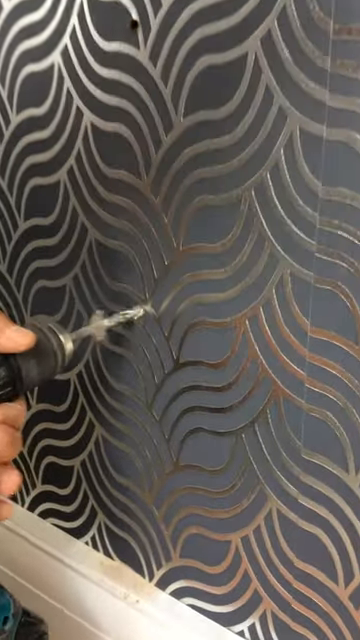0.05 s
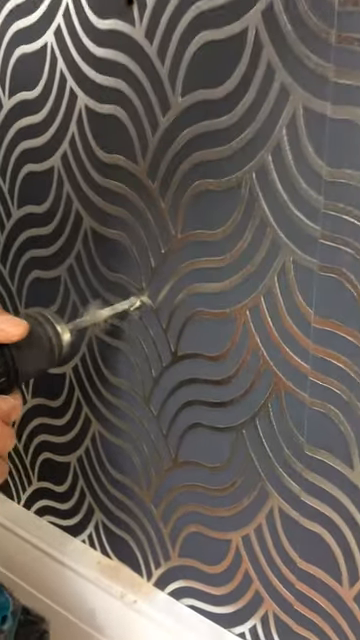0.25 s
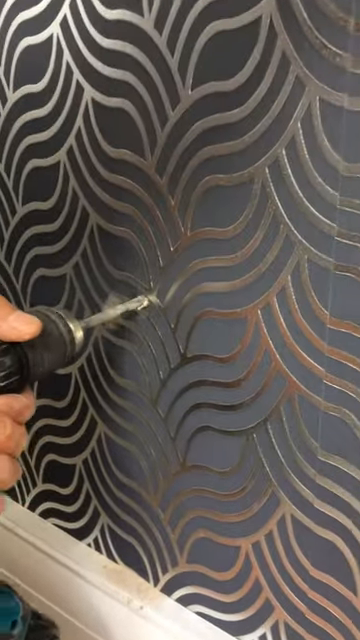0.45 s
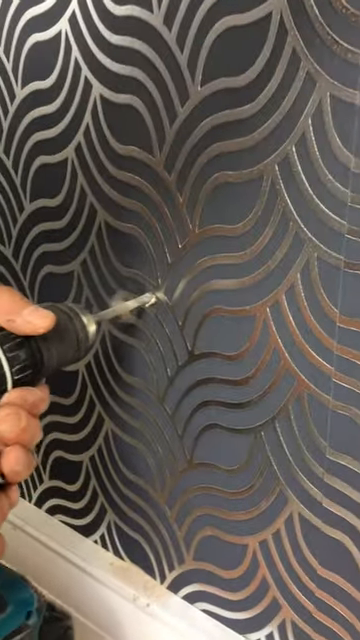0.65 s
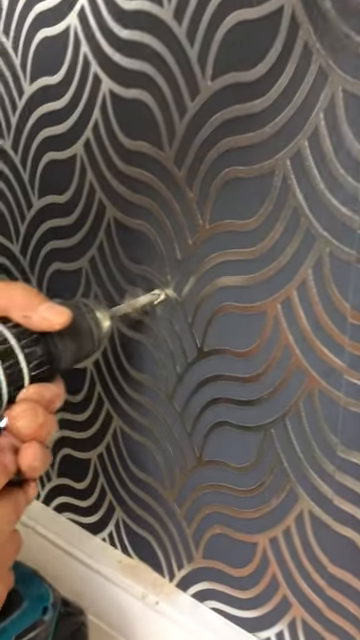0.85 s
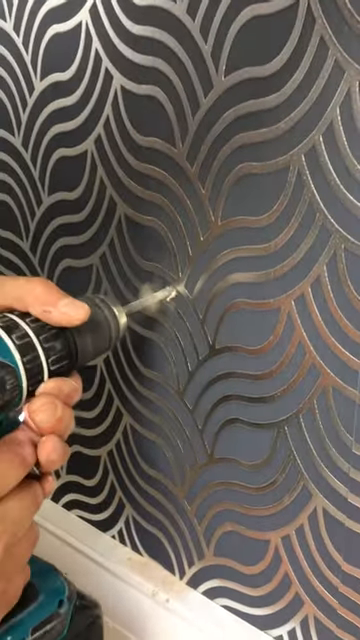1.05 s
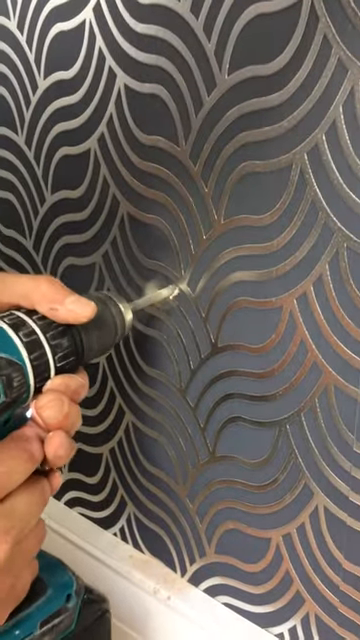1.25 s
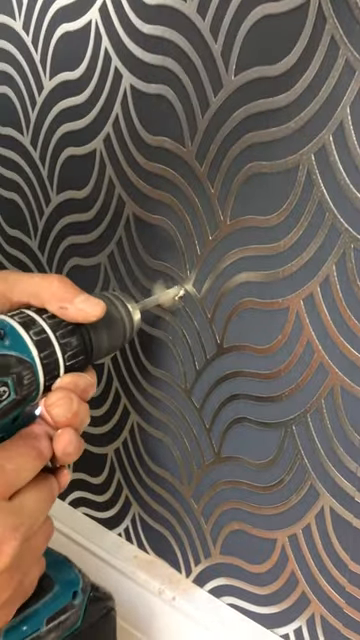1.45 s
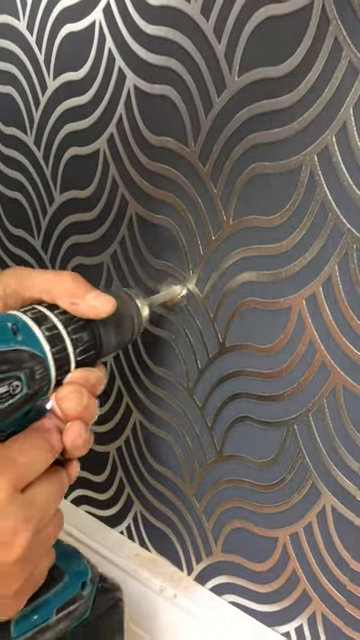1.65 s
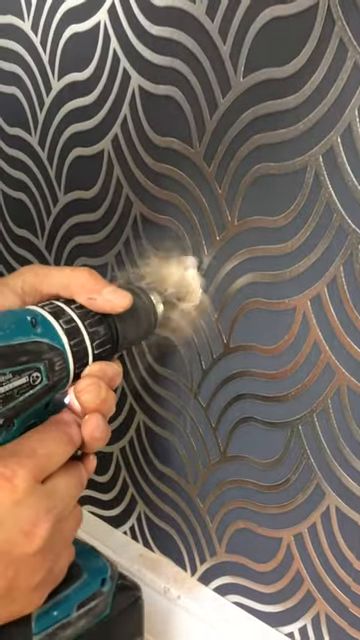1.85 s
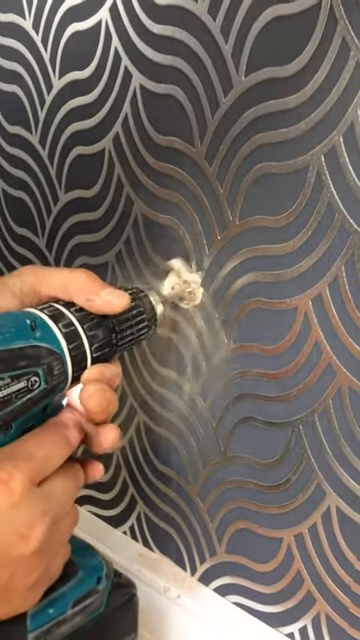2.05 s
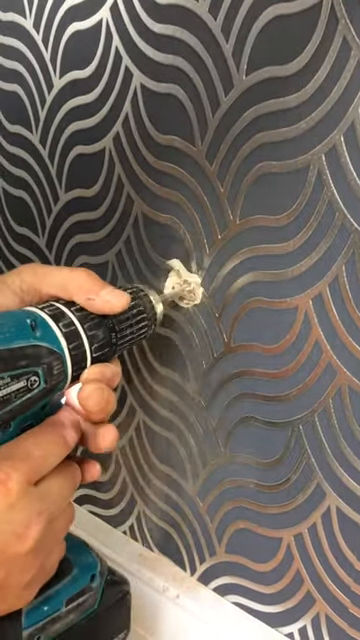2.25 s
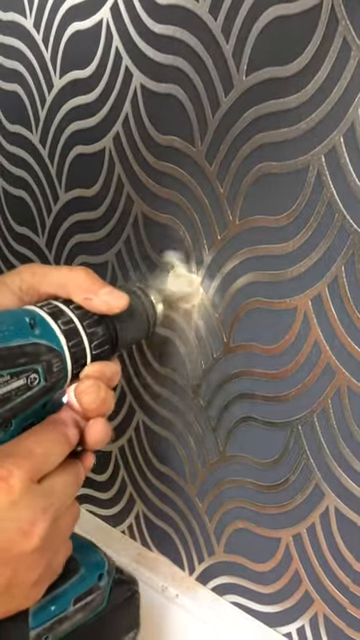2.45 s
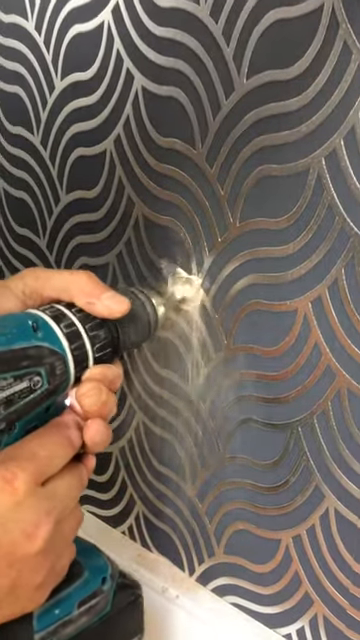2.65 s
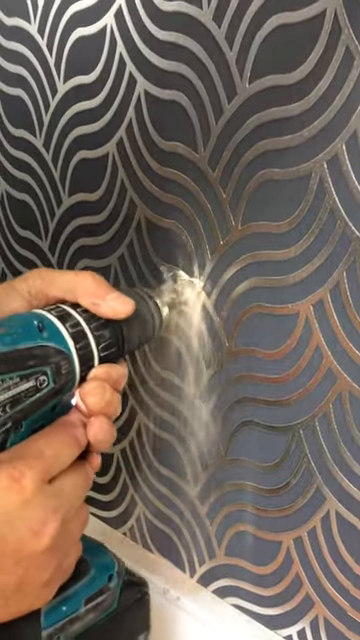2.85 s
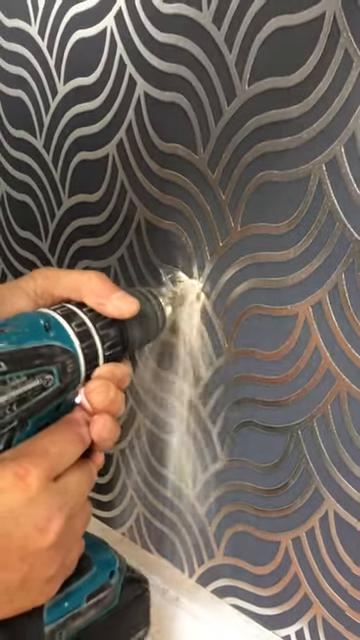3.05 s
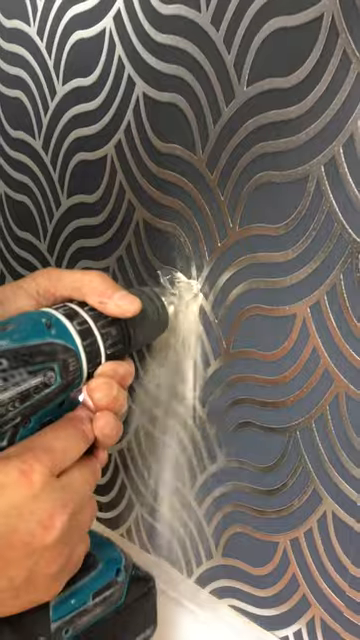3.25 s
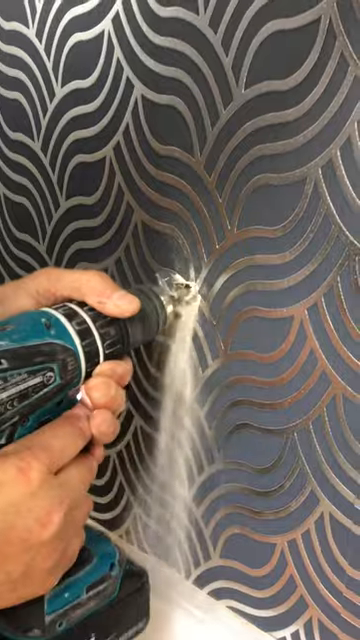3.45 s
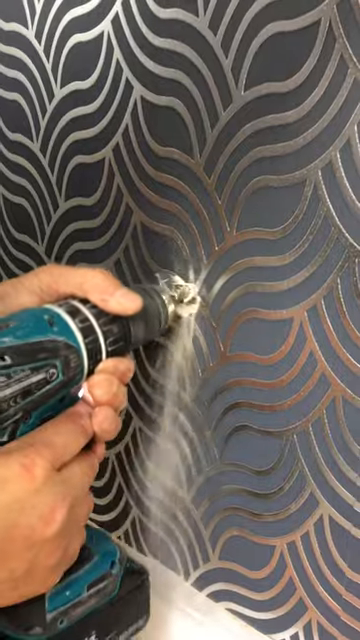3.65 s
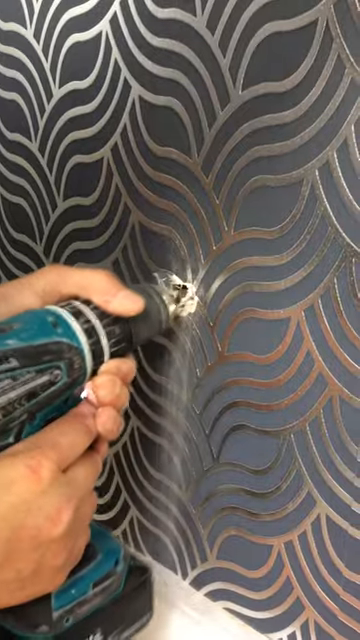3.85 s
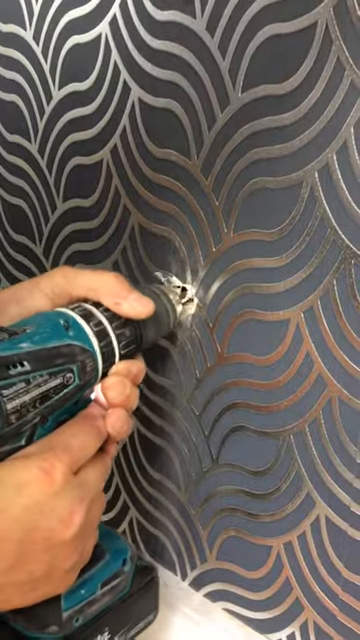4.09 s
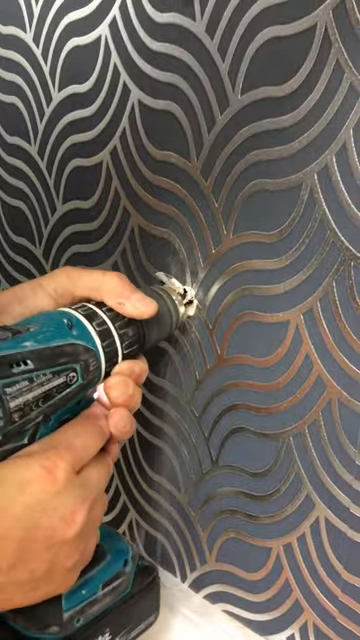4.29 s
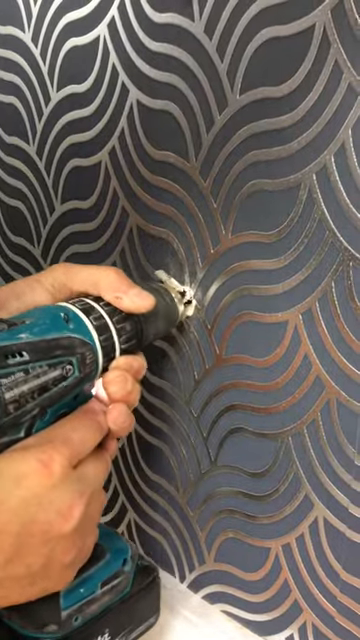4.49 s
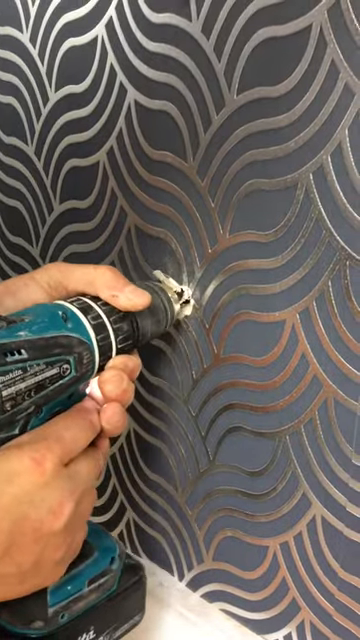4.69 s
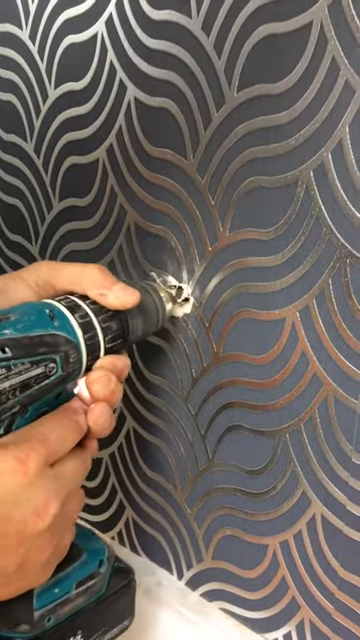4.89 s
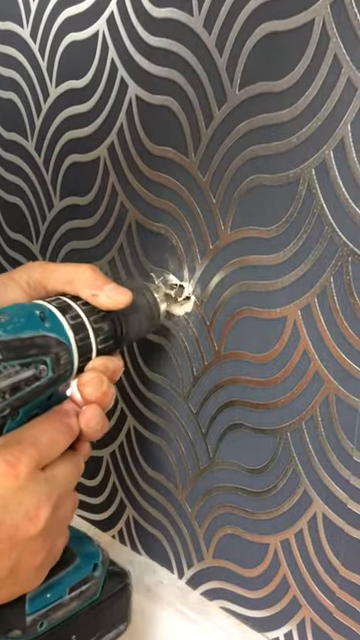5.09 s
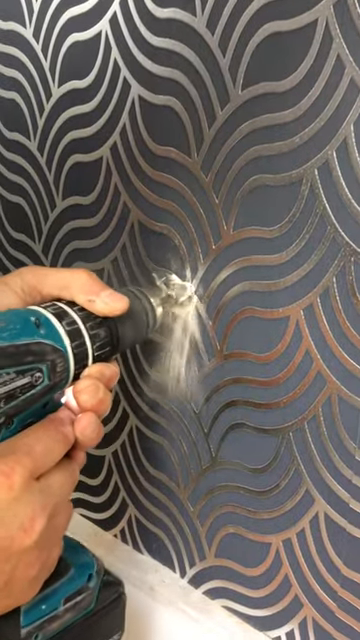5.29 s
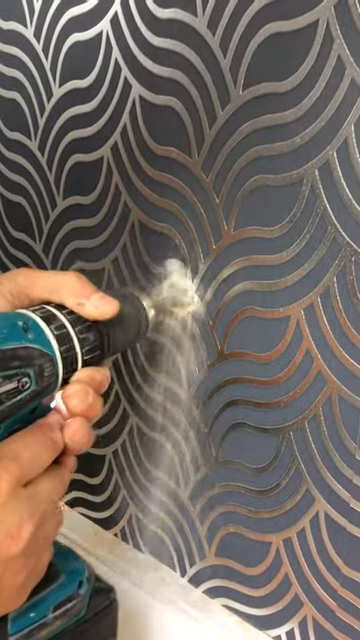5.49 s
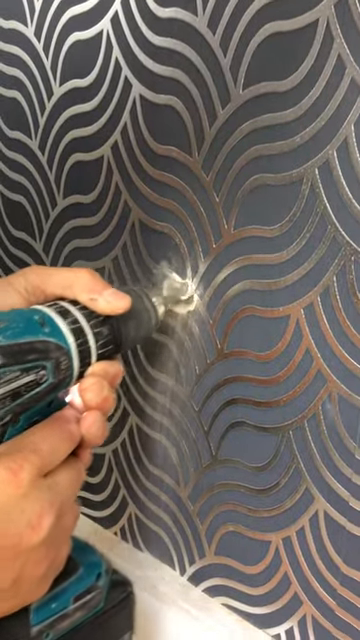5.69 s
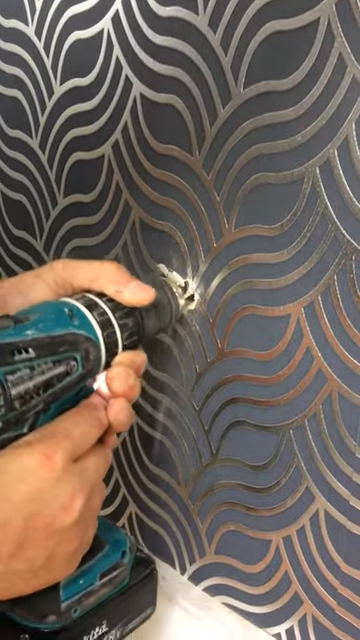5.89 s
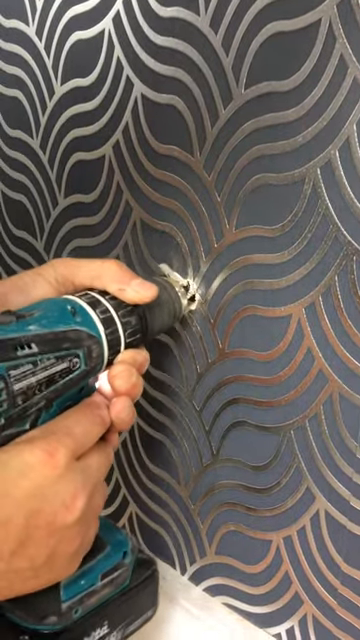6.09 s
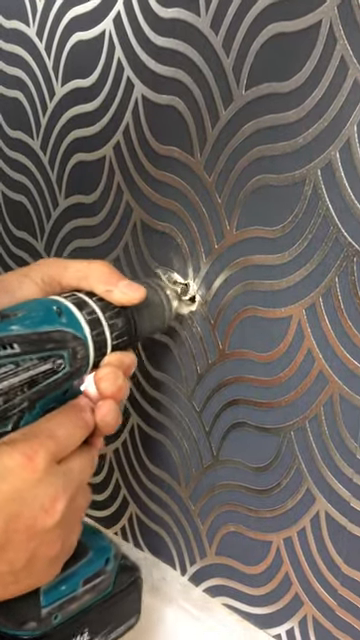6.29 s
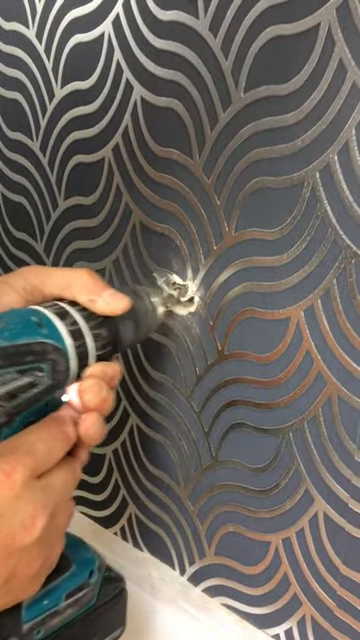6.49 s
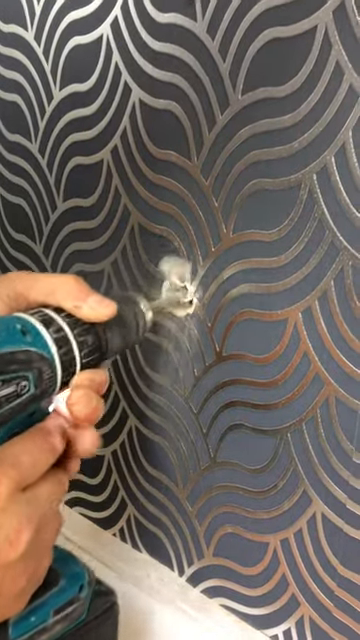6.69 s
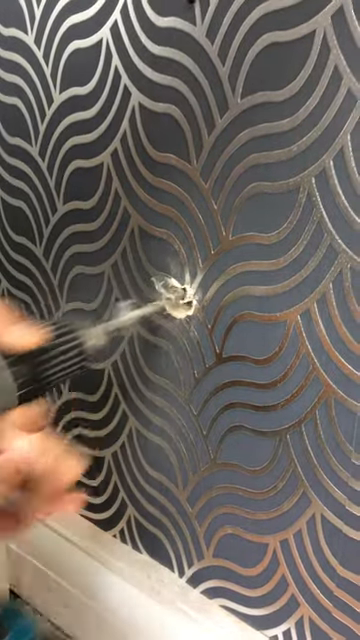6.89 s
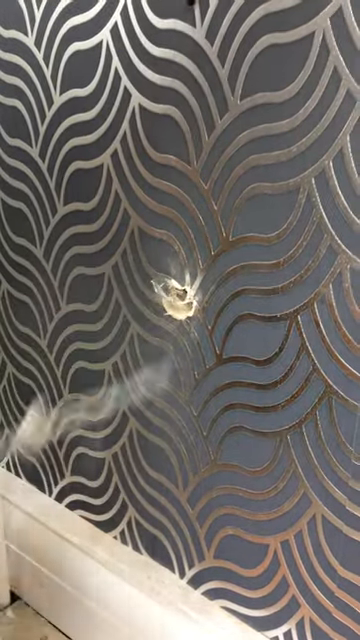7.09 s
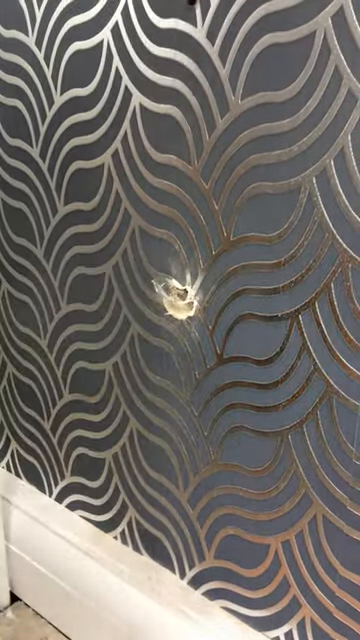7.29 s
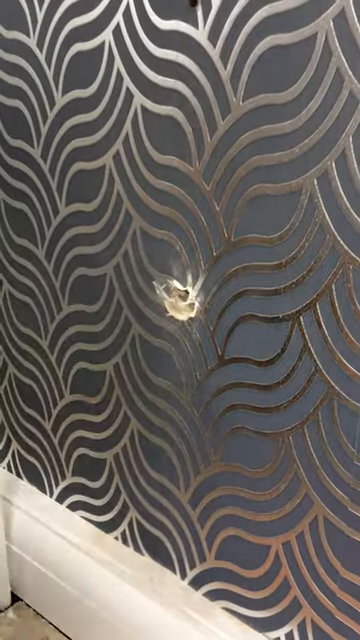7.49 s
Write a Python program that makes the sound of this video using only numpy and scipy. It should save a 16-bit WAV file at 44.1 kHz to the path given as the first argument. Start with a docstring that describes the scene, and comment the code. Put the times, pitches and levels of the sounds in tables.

```python
"""A small room: a cordless drill bores through plasterboard into brick in three spells, close, in mono.
Motor speed sets the pitch and level of the gears' whine and rattle. It jumps with each trigger squeeze
and sags when the bit catches. The bit grinds, chips and squeaks in the hole; the hollow board booms
and knocks when the drill leans on it. At the end the bit is drawn out."""
import sys
import numpy as np
from scipy import signal
from scipy.fft import rfft, irfft
from scipy.io import wavfile
from scipy.ndimage import uniform_filter1d

SR = 44100
rng = np.random.default_rng(int(sys.argv[2]) if len(sys.argv) > 2 else 0)


def output_pcm(signal):
    """Save a mono or channel-first signal as 16-bit PCM at the path in sys.argv[1].

    Samples are clipped to [-1, 1] before scaling.
    """
    pcm = np.clip(np.atleast_2d(signal).T, -1, 1) * 32767
    wavfile.write(sys.argv[1], SR, np.round(pcm).astype(np.int16))


N = 332514
TIME_S = np.arange(N) / SR
FREQ_HZ = np.maximum(np.arange(N // 2 + 1) * SR / N, 1)
CRUISE_HZ = 1623  # reference tooth rate

# Held-trigger speed, one table a spell. Each row: time in seconds, tooth rate in Hz.
STARTING = [(0, 757.5), (.6, 801.6), (.83, 1319), (1.0, 1362), (1.2, 1949), (1.75, 1826), (1.86, 1866),
            (2.0, 1549), (2.1, 677), (2.2, 291.3)]
BORING = [(2.39, 189.1), (2.461, 696), (2.68, 718), (2.745, 577), (2.821, 926), (2.9, 1010), (2.98, 760),
          (3.07, 961), (3.19, 966), (3.33, 1457), (3.801, 1480), (4.59, 1397), (4.72, 412)]
DEEPENING = [(4.81, 403.7), (4.929, 1039), (5.5, 1105), (5.68, 1197), (6.08, 956), (6.298, 1014),
             (6.67, 1013), (6.929, 302.2), (7.302, 151)]
# Trigger squeezes. Each row: time of top in seconds, top tooth rate in Hz, hold in seconds, fall in Hz/s.
SQUEEZES = [(.364, 2159, 0.036, 7483), (0.729, 2094, .035, 11400), (1.063, 2372, .055, 4510),
            (2.53, 1866, .012, 8300)]
# Gear load. Each row: time in seconds, load from 0 to 1.
LOAD = [(.3, 0.72), (.75, 0.64), (.9, 0.12), (1.1, 0.82), (1.3, 0.41), (1.8, 0.33), (1.95, 0.51),
        (2.55, 0.7), (2.8, 1), (3.9, 1), (4.15, 0.75), (5.0, 0.78), (5.9, 0.7), (6.35, 0.32)]
# Whine by speed. Each row: tooth rate in Hz, level in dB. All table levels are relative.
WHINE_BY_RATE = [(400, -42.5), (640, -40.5), (800, -44), (1020, -36.5), (1300, -35), (1490, -25),
                 (1700, -34), (1950, -34), (2120, -31.5), (2500, -32)]
# Gear trims apart from speed. Each row: time in seconds, whine in dB, rattle in dB.
GEAR_TRIM = [(0, -10, 1.5), (.24, -2, 4), (.3, 2, 2.5), (.9, 0, 0.5), (1.15, 4.5, 2), (1.3, -2.5, -1),
             (1.46, 0.5, 0.5), (1.56, 1.5, 0.5), (1.74, 4.5, -1), (1.8, -2.5, 0), (2.01, 0, 0.5),
             (2.07, -15, -7.5), (2.2, -11, -8), (2.43, -2, 0), (2.5, 1, 0.5), (2.6, 0, -2), (2.65, -4, -1),
             (2.75, 3, 1), (3.15, -0.5, -0.5), (3.27, 0.5, 0.5), (3.84, -4, -3.5), (3.92, -13, 0),
             (4.0, -7, -1), (4.5, -4.5, -1.5), (4.63, -11, -2.5), (4.75, -4.5, -2.5), (5.05, -4.5, 0.5),
             (5.6, -9.5, -3.5), (5.9, -6.5, -3), (6.4, -4, -1), (6.8, -12.5, -5)]
# Mesh overtones. Each row: multiple of the tooth rate, level in dB.
OVERTONES = [(2, -7.5), (3, -6.5), (4, -7), (5, -7)]
# Overtones against rattle. Each row: time in seconds, trim in dB.
OVERTONE_TRIM = [(.5, -10), (.74, -1), (.95, -4.5), (1.1, -3), (1.27, 0), (1.95, -3), (2.55, -1.5),
                 (2.85, -1.5), (3.2, 0.5), (3.4, -4), (3.85, 1.5), (3.95, -10), (4.12, 0), (4.5, -5),
                 (4.8, -1.5), (6.45, -4), (6.75, -3.5)]
# Gearbox and wall resonances. Each row: frequency in Hz, width in Hz, gain in dB.
HOUSING_MODES = [(1850, 270, 3), (2705, 70, 3.5), (3265, 280, -1.5), (3813, 200, 2.5), (4230, 290, 3),
                 (4810, 250, 0.5), (8400, 910, -8)]
WALL_MODES = [(210.7, 28, -4.5), (390.3, 4.8, 15.5), (487.7, 17.6, 10.5), (645, 69, -4.5)]
# Noise spectra. Each row: frequency in Hz, level in dB.
RATTLE_SPECTRUM = [(1200, -27), (2400, -6.5), (3300, -6.5), (4100, -0.5), (5200, -5), (7500, -5),
                   (9500, -8), (13000, -15.5), (15500, -25)]
GRIT_SPECTRUM = [(40, -40), (200, -8.5), (380, -11.5), (560, -4.5), (820, -6), (1100, 1), (2500, -4),
                 (4300, -0.5), (6500, -9), (12000, -39)]
BOARD_SPECTRUM = [(60, -25), (130, -2), (195, 1.5), (255, -7.5), (345, -14.5), (400, -13.5), (700, -21.5)]
AIR_SPECTRUM = [(18, -65), (30, -50), (71, -6), (228, -23), (394, -9.5), (472, -23), (1140, -25),
                (1370, -27), (1650, -23), (9500, -34), (14000, -38)]
# Bit grinding. Each row: time in seconds, level in dB.
GRIND_LEVEL = [(0.03, -46.5), (0.13, -44.5), (0.43, -47.5), (1.79, -45), (1.99, -45), (2.36, -69),
               (2.44, -45), (3.98, -40), (4.34, -45.5), (4.44, -36), (4.69, -45.5), (5.7, -53), (6.13, -44),
               (6.3, -45.5), (6.75, -56.5), (7.1, -59), (7.4, -69)]
# Board boom under leaning, and drone. Each row: start and end in seconds, level in dB.
LEANS = [(.28, 1.3, -61.5), (1.84, 1.98, -53), (2.45, 2.58, -57), (3.25, 4.3, -53), (4.35, 4.63, -39),
         (6.0, 6.24, -46.5)]
DRONES = [(2.46, 3.2, -58.5)]
# Bit squeaks, and the housing ringing out at full speed.
# Each row: start in seconds, level in dB, pitch in Hz, length in seconds, sag as a fraction of pitch.
BIT_SQUEAKS = [(.162, -30, 4320, 0.033, 0), (4.122, -17.5, 2167, 0.023, 0), (4.145, -19, 2160, 0.015, 0.06),
               (4.242, -14.5, 2133, 0.015, 0), (4.255, -30, 2120, 0.049, 0.02),
               (4.564, -19, 2060, 0.0084, 0.08), (4.851, -21, 2680, 0.0166, 0.06),
               (4.992, -28.5, 2167, 0.013, 0.03), (5.0975, -17, 2563, 0.0059, 0),
               (5.109, -20, 2586, 0.0042, 0.05), (5.155, -27.5, 2330, 0.0232, 0.1),
               (6.15, -18.5, 1847, .02, 0.02), (6.295, -27.5, 2447, 0.036, 0), (6.44, -27, 2153, .018, 0),
               (6.463, -14.5, 2660, .011, 0.01), (6.474, -26, 2560, 0.019, 0.15)]
HOUSING_SHRIEKS = [(.368, -10, 4020, .009, .02), (.378, -24, 4000, .04, .02)]
# Bit chatter. Each row: start and end in seconds, level in dB, centre pitch in Hz.
CHATTER = [(4.951, 5.348, -36, 2300), (5.747, 6.601, -38, 2250), (5.7, 6.72, -35, 4400)]
# Ringing band: the idling gears' overtone in the first row, the bit rubbing in the rest.
# Each row: start and end in seconds, level in dB, lower mode in Hz.
RINGING_BAND = [(0.028, 0.243, -36, 1574), (2.443, 2.74, -41, 1512), (2.959, 3.142, -41.5, 1610),
                (4.828, 6.7, -46, 1551), (6.723, 6.87, -48.5, 1480), (6.92, 6.99, -52.5, 1610)]
# Chips and tool knocks. Each row: start in seconds, level in dB, decay in seconds.
CHIPS = [(0.289, -9.5, 0.0089), (1.806, -26, 0.0042), (2.399, -33, 0.0076), (2.9133, -9.5, 0.011),
         (2.925, -16.5, 0.067), (3.4887, -15, 0.0041), (4.455, -9.5, 0.0037), (5.8411, -14.5, 0.0048),
         (5.98, -15, 0.0055), (7.432, -43, 0.0046), (7.4686, -43, 0.0093), (7.501, -29, 0.019)]
# Bit catches. Each row: start in seconds, level in dB, fraction of speed lost.
CATCHES = [(0.294, -27, 0.05), (1.866, -32, .11), (2.905, -50, 0.33), (3.356, -23.5, 0.21),
           (3.861, -23.5, .15), (5.838, -32, 0)]
# Knocks on the board. Each row: start in seconds, level in dB.
KNOCKS = [(1.852, -29.5), (1.912, -38), (2.538, -32), (3.35, -40), (3.86, -40), (4.361, -23),
          (4.426, -25.5), (4.472, -21), (4.539, -27), (4.605, -28), (5.945, -34.5), (6.025, -31.5),
          (6.097, -35), (6.132, -24), (6.199, -31)]
# Board ring after a knock. Each row: frequency in Hz, level in dB, decay in seconds.
BOARD_MODES = [(132, 0, 0.0072), (197, 2, 0.011), (220, -7.5, 0.013), (298, -9, 0.014), (407, -15, 0.027)]


def motor_rate_hz(load, spin_up_hz_per_s=13500, snag_s=.035, inertia_s=.015, lurch_below_hz=1150):
    """Tooth rate: sags at catches, jumps at squeezes, lurches when slow and heavily loaded."""
    hz, = curves(STARTING + BORING + DEEPENING)
    for start_s, _, lost in CATCHES:
        since = (np.maximum(TIME_S - start_s, 0) / snag_s) ** 2
        hz = hz * (1 - lost * since * np.exp(1 - since))
    for top_s, top_hz, hold_s, fall_hz_per_s in SQUEEZES:
        rising_hz = top_hz - spin_up_hz_per_s * np.maximum(top_s - TIME_S, 0)
        hz = np.maximum(hz, rising_hz - fall_hz_per_s * np.maximum(TIME_S - top_s - hold_s, 0))
    hz = uniform_filter1d(hz, int(inertia_s * SR))
    labour = load ** 6 / (1 + (hz / lurch_below_hz) ** 8)
    return hz * (1 + .07 * labour * wander(65))


def tooth_cycles(rate_hz, load):
    """Running count of teeth; speed wavers and judders under load."""
    unsteady = .028 * wander(35.17) + .02 * wander(232.4)
    return np.cumsum(rate_hz * (1 + load * unsteady)) / SR


def gears(teeth, rate_hz, load, rattle_db_per_octave=7, stall_hz=466):
    """Gearbox whine and rattle: speed sets their levels, and both fade near a stall."""
    speed = rate_hz / CRUISE_HZ
    octaves = np.log2(speed)
    whine_trim_db, rattle_trim_db = curves(GEAR_TRIM)
    tone_db = level_at(rate_hz, WHINE_BY_RATE) + whine_trim_db - 1.5
    stall_db = 10 * np.log10(1 + (stall_hz / rate_hz) ** 4)
    rattle_db = -27.5 + rattle_db_per_octave * octaves - stall_db + rattle_trim_db
    # slow teeth meet softly and lose overtones
    overtone_db = rattle_db + curves(OVERTONE_TRIM)[0] + 4 * np.minimum(octaves, 0)
    running = np.clip((rate_hz - 270) / 230, 0, 1)
    return running * whine(teeth, speed, load, tone_db, overtone_db) + rattle(teeth, rattle_db)


def whine(teeth, speed, load, tone_db, overtone_db, planet_db=-13):
    """Meshing teeth sing, brokenly under load; backlash smears the overtones, which ring the housing."""
    angle = 2 * np.pi * teeth
    flutter = undb(4.5 * (.4 + .6 * load) * np.clip(wander(65), -3, 1.3))
    rasp = undb(-3.5) * np.sqrt(speed) * wander(440)  # uneven teeth
    tone = unit(np.sin(angle) * (flutter + rasp))
    backlash = (.22 + .15 * load) * np.sqrt(speed) * wander(220)
    overtones = sum(undb(db + 3.4 * wander(180)) * np.sin(k * (angle + backlash)) for k, db in OVERTONES)
    overtones = butter(resonate(overtones, HOUSING_MODES), order=2, cutoff_hz=9500)
    # slower planet gears sound below the tooth rate
    planets = sum(ratio * np.sin(ratio * angle + 1.2 * wander(70)) for ratio in (1 / 2, 3 / 4))
    return undb(tone_db) * tone + undb(overtone_db) * (overtones + undb(planet_db) * planets)


def rattle(teeth, level_db, pulse_depth=.097):
    """Teeth and brushes tick in a bright hiss that pulses once a tooth."""
    ticks = grains(per_s=24000, spread_db=.5) * (1 + pulse_depth * np.cos(2 * np.pi * teeth))
    hiss = band_unit(colour(ticks, RATTLE_SPECTRUM), 3630, 15000)
    return hiss * undb(level_db - .44 + wander(31))


def grinding(teeth, rate_hz, load, full_bite_hz=724, teeth_per_edge=48, sway_hz=85, sway_width_hz=34):
    """Cutting edges crush grit in turn, softer when slow; their blows shake the hollow board."""
    stalling = np.clip(np.log2(full_bite_hz / rate_hz), 0, 1)
    grind_db = curves(GRIND_LEVEL)[0] - 9 * stalling
    boom_db = 20 * np.log10(undb(grind_db - 8.5) + held_gain(LEANS))
    edges_db = .5 * load * np.sin(2 * np.pi * teeth / teeth_per_edge)
    grit = resonate(colour(grains(per_s=5000, spread_db=2), GRIT_SPECTRUM), WALL_MODES)
    blows = grains(per_s=350, spread_db=2)
    boom = resonate(colour(blows, BOARD_SPECTRUM), WALL_MODES)
    # lowest panel mode, driven by biting and leaning
    sway = mode(mode(blows, sway_hz, sway_width_hz), sway_hz, sway_width_hz)
    return (band_unit(grit, 310, 914) * undb(grind_db - 2.5 + edges_db + 2.9 * wander(26))
            + band_unit(boom, 174, 330) * undb(boom_db - 2 + edges_db)
            + sway * undb((2 * grind_db + boom_db) / 3 - 14.5 + 4 * load))


def squeaks(rows, overtone_db, ring_s=.04, ring_db=-15):
    """Steel sticks and slips: a rough tone swells, glides and rings off."""
    out, t = np.zeros(N), TIME_S[:SR // 5]
    slip = .024 * wander(350)
    grip = undb(1.8 * wander(250)) * (1 + .17 * wander(700))
    for start_s, db, hz, length_s, sag in rows:
        here = int(start_s * SR) + np.arange(len(t))
        pitch_hz = hz * (1 + slip[here] - sag * np.tanh(2 * t / length_s - 1))
        angle = 2 * np.pi * np.cumsum(pitch_hz) / SR
        tone = np.sin(angle) + undb(overtone_db) * np.sin(2 * angle)
        progress = np.minimum(t / length_s, 1)
        swell = np.sin(np.pi * progress ** 1.4)
        ring = undb(ring_db) * progress * np.exp(-np.maximum(t - length_s, 0) / ring_s)
        add(out, start_s, undb(db) * (swell + ring) * tone)
    return out * grip


def chatter_rows(per_s=15, pitch_spread=.23, median_length_s=.0106, max_sag=.041):
    """Brief random slips of the bit, rising or falling, as rows for squeaks()."""
    rows = []
    for start_s, end_s, db, hz in CHATTER:
        span_s = end_s - start_s
        for when, glide, detune, stretch in rng.uniform(-1, 1, (40, 4))[:int(per_s * span_s)]:
            at_s = start_s + span_s * (when + 1) / 2
            pitch_hz = hz * (1 + pitch_spread * detune)
            rows.append((at_s, db, pitch_hz, median_length_s * 2 ** stretch, max_sag * glide))
    return rows


def ringing_band(upper_ratio=2.2, upper_db=-8, uneven_db=2.5):
    """A ringing band near 1.5 kHz: the idling gears' overtone at first, the bit rubbing later."""
    out = np.zeros(N)
    clicks = grains(per_s=1700, spread_db=-5.5)
    for start_s, end_s, db, hz in RINGING_BAND:
        lower = mode(clicks, hz, width_hz=170)
        upper = mode(clicks, upper_ratio * hz, width_hz=300)
        out += (lower + undb(upper_db) * upper) * held_gain([(start_s, end_s, db)])
    return out * undb(uneven_db * wander(20))


def chips():
    """Chips break off and the tool knocks: short bright cracks."""
    out, t = np.zeros(N), TIME_S[:SR // 10]
    for start_s, db, decay_s in CHIPS:
        add(out, start_s, undb(db - 6) * np.exp(-t / decay_s) * rng.standard_normal(len(t)))
    return butter(out, order=1, cutoff_hz=[1200, 9000], kind="band")


def jolts(decay_s=.028, thud_db=-7):
    """Each catch crushes a burst of grit and thumps the board."""
    push = np.zeros(N)
    for start_s, db, _ in CATCHES:
        add(push, start_s, undb(db) * np.exp(-TIME_S[:SR // 4] / decay_s))
    crunch = unit(colour(grains(per_s=5200, spread_db=-4), GRIT_SPECTRUM))
    thud = unit(colour(rng.standard_normal(N), BOARD_SPECTRUM))
    return push * (crunch + undb(thud_db) * thud)


def knocks(rise_s=.00884, detune=.097):
    """The juddering bit knocks the board; its modes swell and die quickly."""
    out, t = np.zeros(N), TIME_S[:SR // 6]
    swell = 1 - np.exp(-(t / rise_s) ** 2)
    for start_s, db in KNOCKS:
        for hz, mode_db, decay_s in BOARD_MODES:
            pitch_hz = hz * (1 + detune * rng.standard_normal())
            ring = np.exp(-t / decay_s) * np.sin(2 * np.pi * pitch_hz * (t - rise_s))
            add(out, start_s, undb(db + mode_db + 2) * swell * ring)
    return out


def drone():
    """A low board mode hums while the bit labours."""
    return mode(rng.standard_normal(N), hz=124.8, width_hz=5) * held_gain(DRONES)


def room(x, t60_s=.26, gap_s=.0021, wet_db=-7):
    """Floor and walls add a short, dull tail."""
    t = TIME_S[:SR // 2]
    tail = rng.standard_normal(len(t)) * np.exp(-np.log(1000) * t / t60_s) * (t > gap_s)
    tail = butter(tail / np.linalg.norm(tail), order=1, cutoff_hz=3500)
    return x + undb(wet_db) * signal.fftconvolve(x, tail)[:N]


def air(level_db=-61.5):
    """Faint, steady room noise."""
    return undb(level_db) * unit(colour(rng.standard_normal(N), AIR_SPECTRUM))


def held_gain(rows, attack_s=.012, release_s=.037):
    """Envelope: each row builds, holds and dies away."""
    return sum(undb(db) * np.clip((TIME_S - start_s) / attack_s, 0, 1)
               * np.exp(-np.maximum(TIME_S - end_s, 0) / release_s) for start_s, end_s, db in rows)


def grains(per_s, spread_db):
    """Dense clicks of uneven size, rms 1."""
    hit = rng.random(N) < per_s / SR
    return unit(hit * rng.standard_normal(N) * undb(spread_db * np.minimum(rng.exponential(size=N), 5)))


def wander(hz):
    """Smooth noise up to about hz, rms 1."""
    return unit(irfft(rfft(rng.standard_normal(N)) * np.exp(-(FREQ_HZ / hz) ** 2), N))


def mode(x, hz, width_hz):
    """x through one resonance, rms 1."""
    return unit(irfft(rfft(x) / (1 + ((FREQ_HZ - hz) / width_hz) ** 2), N))


def resonate(x, modes):
    """x plus the ring of a body's modes."""
    ring = sum(undb(db) / (1 + 1j * (FREQ_HZ ** 2 - hz ** 2) / (FREQ_HZ * width_hz))
               for hz, width_hz, db in modes)
    return irfft(rfft(x) * (1 + ring), N)


def colour(x, spectrum):
    """Filter by (Hz, dB) points."""
    return irfft(rfft(x) * undb(level_at(FREQ_HZ, spectrum)), N)


def level_at(hz, points):
    """dB at hz, interpolated over log frequency."""
    points_hz, db = np.transpose(points)
    return np.interp(np.log(hz), np.log(points_hz), db)


def curves(rows):
    """Each value column interpolated over time."""
    times_s, *columns = np.transpose(rows)
    return [np.interp(TIME_S, times_s, column) for column in columns]


def butter(x, order, cutoff_hz, kind="low"):
    return signal.sosfilt(signal.butter(order, cutoff_hz, kind, fs=SR, output="sos"), x)


def band_unit(x, lo_hz, hi_hz):
    """Scale to rms 1 within a band."""
    return x / np.std(irfft(rfft(x) * ((FREQ_HZ > lo_hz) & (FREQ_HZ < hi_hz)), N))


def unit(x):
    return x / np.std(x)


def undb(db):
    return 10 ** (np.asarray(db) / 20)


def add(out, start_s, x):
    start = int(start_s * SR)
    out[start:start + len(x)] += x[:N - start]


def scene():
    """Drill, bit and wall in the room; both channels equal."""
    load, = curves(LOAD)
    rate_hz = motor_rate_hz(load)
    teeth = tooth_cycles(rate_hz, load)
    shrieks = squeaks(HOUSING_SHRIEKS, overtone_db=-20)
    slips = squeaks(BIT_SQUEAKS + chatter_rows(), overtone_db=-15)
    drill = gears(teeth, rate_hz, load) + shrieks
    drilling = drill + grinding(teeth, rate_hz, load) + slips + ringing_band() + chips() + jolts()
    board = knocks() + drone()
    return np.tile(undb(-1) * room(drilling + board) + air(), (2, 1))


def record(dry):
    """Steep low-pass at 15.5 kHz."""
    return signal.sosfilt(signal.ellip(10, .2, 80, 15500, fs=SR, output="sos"), dry)


dry = scene()
out = record(dry)
output_pcm(out)
```